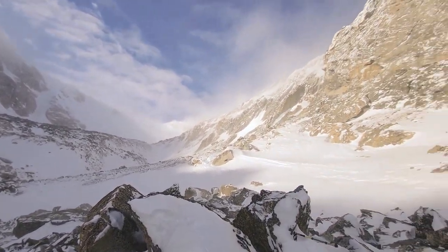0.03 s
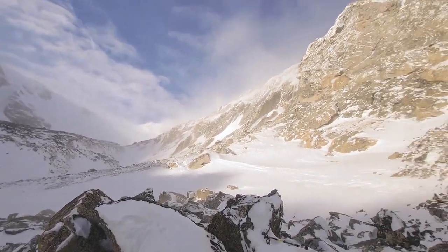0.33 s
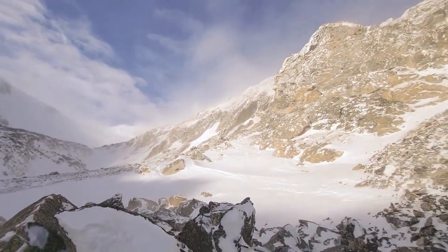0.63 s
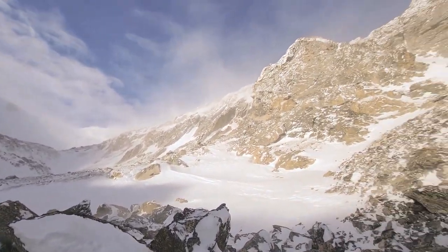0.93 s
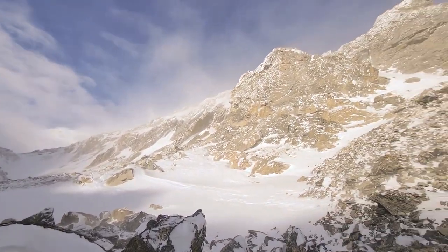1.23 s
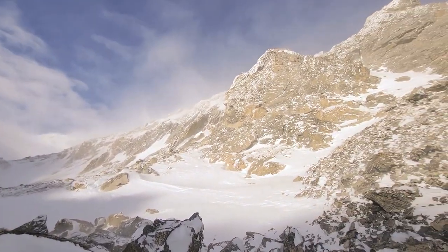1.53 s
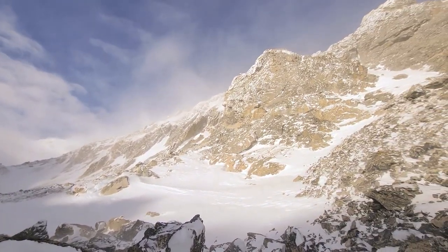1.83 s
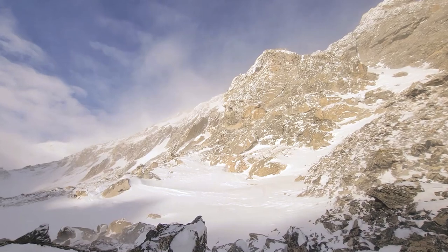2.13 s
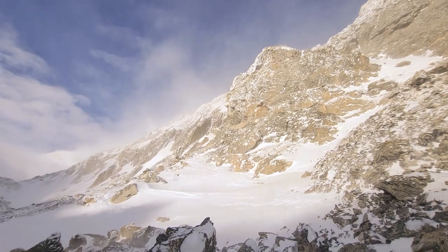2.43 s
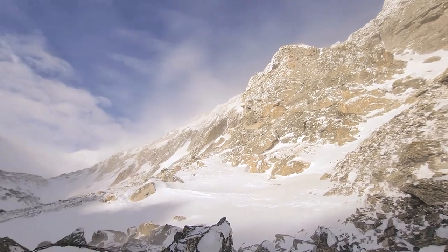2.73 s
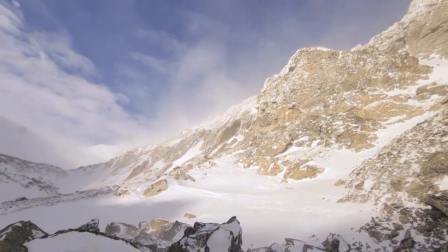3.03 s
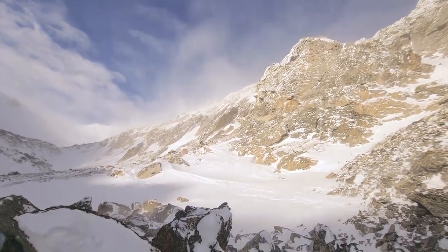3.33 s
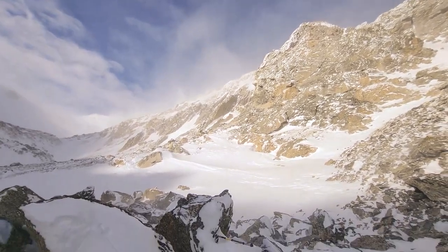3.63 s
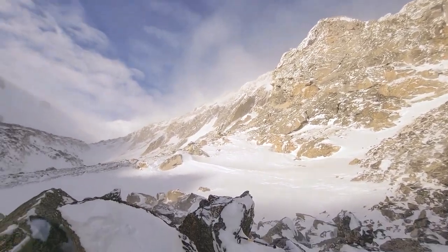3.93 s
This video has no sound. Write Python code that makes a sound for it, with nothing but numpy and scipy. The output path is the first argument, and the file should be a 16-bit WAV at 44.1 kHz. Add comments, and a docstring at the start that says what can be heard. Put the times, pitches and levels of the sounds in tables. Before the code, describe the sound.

Gusty mountain wind rumbles and thumps on the microphone as blown ice grains crackle.

```python
"""Strong gusts hit a small stereo microphone on an open, snowy mountainside.
A flurry opens, tearing across the two ports with a rasp; head-on eddies rumble and buffet, then ease.
From 0.8 s the wind builds, mostly on the right; single eddies thump and slap harder.
From 1.7 to 3.1 s flurries crowd in and blown ice grains crackle on the housing over a thin hiss.
Rumble and buffeting peak at the end, at 4 s."""
import sys
import numpy as np
from scipy import signal
from scipy.fft import rfft, irfft
from scipy.io import wavfile
from scipy.ndimage import uniform_filter1d

SR = 44100
rng = np.random.default_rng(int(sys.argv[2]) if len(sys.argv) > 2 else 0)


def generate_wav(sig):
    """Save sig (samples, or channels by samples) to the path in sys.argv[1] as 16-bit PCM at SR."""
    pcm = np.round(np.clip(np.atleast_2d(sig).T, -1, 1) * 32767).astype(np.int16)
    wavfile.write(sys.argv[1], SR, pcm)


N = 176400
TIME_S = np.arange(N) / SR
BIN_HZ = np.arange(N // 2 + 1) * SR / N

# floor between flurries: (time [s], rasp level [dB], hiss level [dB])
FLOOR_LEVELS = [(0, -22, -33), (.19, -47, -56.5), (.5, -46.5, -52), (.88, -39, -51.5), (1.15, -34.5, -41.5),
                (1.26, -59, -60), (1.35, -37, -55), (1.49, -58, -60), (1.6, -50, -55), (1.85, -35, -42.5),
                (2.3, -39.5, -47), (2.55, -46, -38.5), (2.72, -42.5, -50.5), (3.4, -42, -43.5),
                (3.65, -40.5, -48.5), (4, -38, -41)]
# head-on, each port gets its own eddies: (time [s], leftward bias [dB], unshared noise gain [dB])
WIND_DIRECTION = [(0, -0.5, 9), (.75, 0, 9), (.85, -5, -3), (1.2, -5, -3.5), (1.4, -3, 6), (1.75, -1.5, 7),
                  (1.9, -4, -3.5), (2.4, -5.5, -8.5), (3.3, -6, -10), (3.65, -3.5, 0.5), (4, -6, -11.5)]


def from_db(db):
    """Decibels to gain."""
    return 10 ** (np.asarray(db) / 20)


def unit_rms(x):
    """Scale to rms 1."""
    return x / np.sqrt(np.mean(x ** 2) + 1e-20)


def per_sample(rows):
    """Each column of a time table at every sample."""
    times_s, *columns = np.transpose(rows)
    return [np.interp(TIME_S, times_s, column) for column in columns]


def per_bin(rows):
    """A frequency table at every FFT bin, interpolated in log frequency."""
    hz, value = np.transpose(rows)
    return np.interp(np.log(BIN_HZ + 1e-3), np.log(hz), value)


def colour(x, spectrum):
    """Apply a spectrum; rms 1."""
    return unit_rms(irfft(rfft(x) * from_db(per_bin(spectrum)), N))


def band(x, low_hz, high_hz):
    """Gentle band-pass."""
    return signal.sosfilt(signal.butter(2, [low_hz, high_hz], "band", fs=SR, output="sos"), x + 1e-18)


def pan(side_db):
    """Port gains, mean 1, for a left-minus-right (L-R) level."""
    gains = from_db(np.array([[.5], [-.5]]) * side_db)
    return gains / gains.mean(axis=0)


def fluctuation(width_hz, centre_hz=0):
    """Noise around a centre frequency; rms 1."""
    spectrum = rfft(rng.standard_normal(N)) / (1 + ((BIN_HZ - centre_hz) / width_hz) ** 2)
    return unit_rms(irfft(spectrum, N))


def flutter(corner_hz):
    """Low-passed noise, soft-limited to +-2."""
    return 2 * np.tanh(fluctuation(corner_hz) / 2)


def steady(x, span_s):
    """Even out swells longer than the span; one gain for both ports."""
    power = uniform_filter1d(np.mean(x, axis=0) ** 2, int(span_s * SR))
    return x / np.sqrt(power + 1e-9)


def bursts(rows, rise_s):
    """Stereo envelope of short blows that swell and decay."""
    out = np.zeros((2, N))
    for start_s, db, side_db in rows:
        during = slice(int(start_s * SR), int((start_s + 20 * rise_s) * SR))
        age = np.maximum(TIME_S[during] - start_s, 0) / rise_s
        out[:, during] += pan(side_db) * from_db(db) * age * np.exp(1 - age)
    return out


def port_noise(base_correlation):
    """Noise at the two ports; wind direction widens or narrows it."""
    mid, side = rfft(rng.standard_normal((2, N)))
    shared = irfft(np.sqrt((1 + base_correlation) / 2) * mid, N)
    unshared = irfft(np.sqrt((1 - base_correlation) / 2) * side, N)
    return shared + unshared * from_db(per_sample(WIND_DIRECTION)[1]) * [[1], [-1]]


def across_ports(x, lag_s=0.00014):
    """Eddies reach the right port after the left."""
    return np.array([x[0], np.interp(TIME_S - lag_s, TIME_S, x[1])])


def ice():
    """Large grains crack on the housing; small ones patter over the hiss of drifting snow."""
    # large grains: (time [s], level [dB], L-R [dB])
    impacts = [(.0615, -35, -12), (.1015, -25.5, -19), (.142, -28, -10), (.5365, -40, -2), (.575, -39, -13),
               (.9445, -18.5, -31), (.957, -20, -19), (.978, -26.5, -1), (1.069, -17, -21),
               (1.1345, -19, 0), (1.178, -29, -19), (1.223, -18.5, 4), (1.427, -29.5, -2),
               (1.71, -22.5, -20), (1.7595, -17, -20), (1.7965, -11.5, 4), (1.889, -16.5, 6),
               (2.164, -19, 17), (2.2645, -22.5, 7), (2.4195, -19, -6), (2.445, -11.5, 4.5),
               (2.479, -18.5, 2), (2.53, -13.5, 2), (2.594, -34, 4), (2.83, -21, -1), (3.044, -18, 3),
               (3.097, -15, 6), (3.1035, -10, -5), (3.1455, -16, 28), (3.49, -20, 0), (3.542, -25, 1),
               (3.772, -25.5, -14), (3.785, -28, 19), (3.8225, -22, 10)]
    # (frequency [Hz], level [dB])
    hiss_spectrum = [(500, -5), (3000, 4), (5000, 1), (7000, -2), (9000, -6), (12000, -7.5), (16000, -8)]
    grains_per_s, grain_spread_db = 80, 4
    strikes = steady(port_noise(.65), span_s=.001) * bursts(impacts, rise_s=0.00027)
    cracks = 2 * from_db(-3.5) * (band(strikes, 1370, 6230) + from_db(-20) * strikes)
    hits = rng.random(N) < grains_per_s / SR
    strength = from_db(grain_spread_db * np.minimum(rng.exponential(1, N), 3))
    grains = unit_rms(band(hits * strength * pan(4 * rng.standard_normal(N)), 1000, 5200))
    hiss = colour(rng.standard_normal((2, N)), hiss_spectrum)
    drifting = from_db(per_sample(FLOOR_LEVELS)[1])
    return cracks + drifting * (from_db(-8) * grains + from_db(-7.5) * hiss)


def flurries(churn):
    """Fast air tears at the ports in a sputtering rasp; snow spray swells with it and trails off."""
    # (start [s], length [s], rasp level [dB], spray offset [dB])
    events = [(0, 0.12, -28.5, -10.5), (0.103, 0.077, -34.5, -20), (0.296, 0.059, -35, -16),
              (0.548, 0.028, -33.5, -27), (0.702, 0.073, -36.5, -23), (0.91, 0.044, -26, -12),
              (1.055, 0.021, -26, -8), (1.174, 0.033, -32.5, -17), (1.207, 0.017, -24, -19.5),
              (1.689, 0.054, -27.5, -17.5), (1.74, 0.056, -23.5, -14), (1.826, 0.042, -26.5, -20),
              (1.883, 0.0074, -17, -20), (1.934, 0.057, -25.5, -15), (2.028, 0.094, -30.5, -21),
              (2.125, 0.064, -24.5, -16.5), (2.256, 0.015, -27, -47), (2.351, 0.012, -24.5, -26),
              (2.405, 0.095, -31, -15.5), (2.566, 0.035, -28, -26), (2.782, 0.064, -26, -16.5),
              (2.892, 0.034, -31, -27), (2.939, 0.086, -30, -44), (3.038, 0.021, -27.5, -20),
              (3.073, 0.011, -19.5, -13.5), (3.119, 0.047, -35.5, -9.5), (3.318, 0.043, -39, -9),
              (3.657, 0.02, -31.5, -30), (3.758, 0.034, -30, -7.5), (3.824, 0.048, -34.5, -20),
              (3.906, 0.11, -32, -28)]
    # (frequency [Hz], level [dB])
    rasp_spectrum = [(200, -15), (600, 12.5), (1000, 6.5), (1500, 5.5), (2200, 2), (3000, -7.5),
                     (4200, -25), (7000, -60), (12000, -42)]
    spray_spectrum = [(1000, 1), (3000, 11.5), (5000, -3), (6800, -3.5), (8200, -12.5), (11000, -13),
                      (13000, -6.5), (16000, -16)]
    # (frequency [Hz], base correlation [-])
    port_likeness = [(800, .45), (2200, .55), (5000, .4), (9000, 0)]
    attack_s, rasp_release_s, spray_release_s = 0.0029, 0.0083, 0.0088
    floor_trim_db, rasp_trim_db, spray_trim_db = 1.5, 4, 6.5
    rasp_gain = from_db(per_sample(FLOOR_LEVELS)[0] + floor_trim_db)
    spray_gain = np.zeros(N)
    for start_s, length_s, db, offset_db in events:
        age_s = np.maximum(TIME_S - start_s, 0)
        after_s = np.clip(TIME_S - start_s - length_s, 0, .5)
        rasp_shape = np.minimum(age_s / attack_s, 1) * np.exp(-after_s / rasp_release_s)
        spray_shape = np.minimum(2 * age_s / length_s, 1) * np.exp(-after_s / spray_release_s)
        rasp_gain = np.maximum(rasp_gain, rasp_shape * from_db(db + rasp_trim_db))
        spray_gain += spray_shape * from_db(db + offset_db + spray_trim_db)
    correlation = per_bin(port_likeness)
    air = port_noise(correlation) * from_db(4.7 * churn + 7.8 * flutter(corner_hz=513))
    snow = port_noise(correlation) * from_db(6.9 * churn + 4.2 * flutter(corner_hz=600))
    rasp = rasp_gain * steady(colour(air, rasp_spectrum), span_s=0.039)
    spray = spray_gain * steady(colour(snow, spray_spectrum), span_s=0.042)
    return (rasp + spray) * pan(-0.99)


def slaps():
    """A small eddy bursts on a port: a dull pop, suction first, and a puff of air."""
    # (time [s], level [dB], L-R [dB])
    eddies = [(0.232, -14.5, 3), (.335, -12, -4), (.76, -7.5, -2), (0.914, -7, 16), (1.073, -22, 0),
              (1.117, -3, -7), (1.222, -5, -13), (1.625, -10.5, -2), (1.698, -9, -18), (1.777, -5, 7),
              (1.942, -4, -2), (2.051, -5, 1), (2.104, -4, -1), (2.138, -3, 0), (2.261, -5.5, -4),
              (2.398, -12, -6), (2.579, -5, -7), (2.655, -24, -1), (2.783, -6, -7), (2.817, -1.5, -17),
              (2.952, -4.5, -3), (3.048, -11, -2), (3.082, -5.5, -4), (3.337, 0.5, -8), (3.567, -0.5, -8),
              (3.624, -10, -8)]
    rise_s, median_hz = 0.0014, 288
    pops = np.zeros((2, N))
    for eddy, octaves in zip(eddies, rng.random(len(eddies)) - .5):
        age_s = TIME_S - eddy[0]
        pops -= bursts([eddy], rise_s) * np.sin(2 * np.pi * median_hz * 2 ** octaves * age_s)
    puffs = steady(band(port_noise(.7), 397, 1140), span_s=.008) * bursts(eddies, rise_s)
    return across_ports(from_db(-2) * pops + from_db(-12) * puffs)


def thumps():
    """A large eddy pushes and pulls the diaphragms once or twice, out of step in head-on wind."""
    # (centre time [s], level [dB], L-R [dB])
    eddies = [(0.148, -16, 19), (0.354, -8, 4), (.772, -7, -3), (.835, -5.5, -4), (1.035, -5.5, -2),
              (1.469, -4, -5), (2.036, -7.5, -5), (2.438, -2.5, -6), (2.477, -3.5, -7), (2.6, -11, -11),
              (2.829, -2.5, -11), (2.959, -1, -1), (3.467, -5.5, -5), (3.847, 1, -10), (3.874, -1.5, -6)]
    median_hz, width_s, base_lag_s, trim_db = 69, 0.0086, 0.00058, -3
    lag_s = base_lag_s * from_db(per_sample(WIND_DIRECTION)[1]) * np.array([[-.5], [.5]])
    out = np.zeros((2, N))
    for (centre_s, db, side_db), (pitch, phase) in zip(eddies, rng.random((len(eddies), 2))):
        near = np.abs(TIME_S - centre_s) < 4 * width_s
        age_s = TIME_S[near] - centre_s - lag_s[:, near]
        swing = np.sin(2 * np.pi * (median_hz * 2 ** (pitch - .5) * age_s + phase))
        out[:, near] += pan(side_db) * from_db(db + trim_db) * swing * np.exp(-(age_s / width_s) ** 2)
    return out


def rumble_and_buffeting(churn):
    """Turbulent pressure at the ports; it surges as eddies roll past, more deeply in strong wind."""
    # (time [s], rumble level [dB], buffeting level [dB])
    pressure = [(0.0, -21.5, -23.5), (0.17, -16.5, -25), (0.21, -23, -25), (0.37, -21, -26),
                (0.44, -26.5, -32.5), (1.07, -15.5, -21.5), (1.16, -20.5, -27), (1.43, -25, -24),
                (1.48, -15.5, -28), (1.53, -38, -28.5), (1.61, -28.5, -28.5), (1.66, -19, -21.5),
                (1.92, -17, -20), (3.07, -16.5, -24), (3.21, -18.5, -27), (3.82, -16.5, -21.5),
                (3.84, -20.5, -21.5), (4.0, -11, -17)]
    # (frequency [Hz], level [dB])
    rumble_spectrum = [(8, -41), (20, -10), (32, -2), (50, -3.5), (72, 1.5), (110, -5), (170, -8.5),
                       (300, -14.5), (800, -61), (2000, -100)]
    buffet_spectrum = [(60, -30), (150, -0.5), (220, -5), (300, 1), (430, -0.5), (600, -2), (800, -6),
                       (1250, -14.5), (1650, -26), (3000, -47), (8000, -62)]
    # (frequency [Hz], base correlation [-])
    port_likeness = [(50, 0.62), (120, 0.91), (250, 0.59), (500, 0.5), (1000, 0.04)]
    calm_db, storm_db, storm_surge_db = -50.5, -18, 2.6
    rumble_db, buffet_db = per_sample(pressure)
    bias_db = per_sample(WIND_DIRECTION)[0]
    correlation = per_bin(port_likeness)
    rumble = colour(port_noise(correlation) * from_db(1.57 * churn), rumble_spectrum)
    rumble = steady(rumble, span_s=0.0686) * from_db(rumble_db - 0.5)
    buffet = colour(port_noise(correlation) * from_db(3.2 * churn), buffet_spectrum)
    buffet = steady(buffet, span_s=0.048) * from_db(buffet_db)
    wind = rumble * pan(0.78 * bias_db) + across_ports(buffet) * pan(1.4 * bias_db)
    depth_db = np.interp(buffet_db, [calm_db, storm_db], [0, storm_surge_db])
    surge = np.clip(fluctuation(width_hz=5, centre_hz=7.5), -2, 2)
    return wind * from_db(depth_db * surge)


def scene():
    """One fast churn of the air roughens rumble, buffeting, rasp and spray together."""
    churn = flutter(corner_hz=79.5)
    return rumble_and_buffeting(churn) + thumps() + slaps() + flurries(churn) + ice()


def record(dry):
    """Soft-clip the highest peaks, then cut the top."""
    cutoff_hz = 16200
    rounded = dry / (1 + dry ** 6) ** (1 / 6)
    return signal.sosfilt(signal.ellip(10, .1, 80, cutoff_hz, fs=SR, output="sos"), rounded)


dry = scene()
out = record(dry)
generate_wav(out)
```